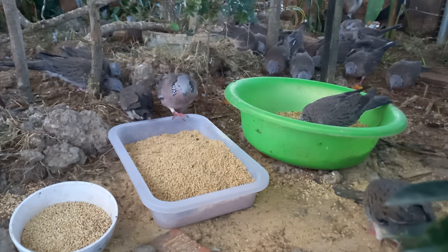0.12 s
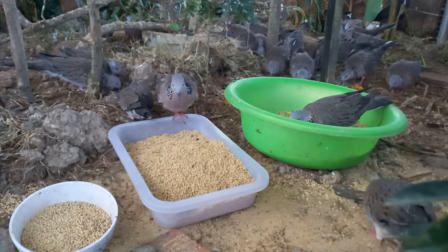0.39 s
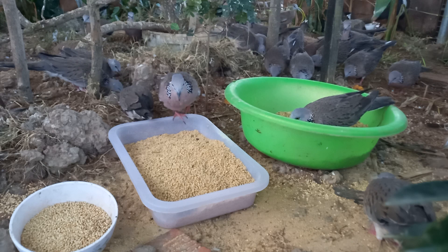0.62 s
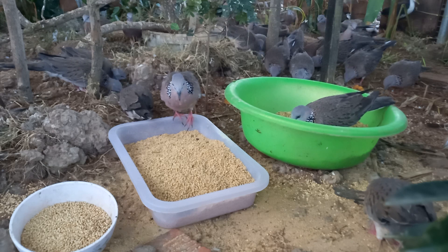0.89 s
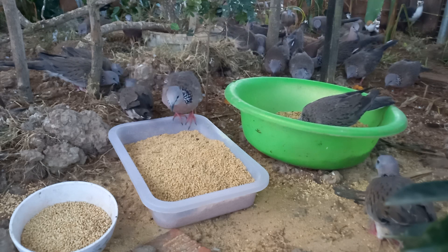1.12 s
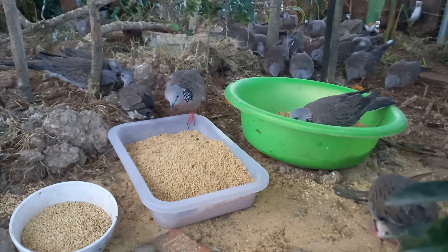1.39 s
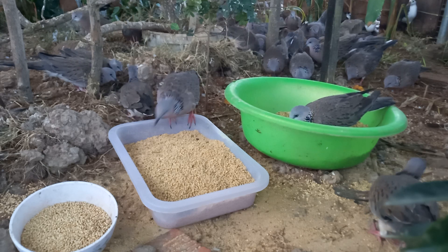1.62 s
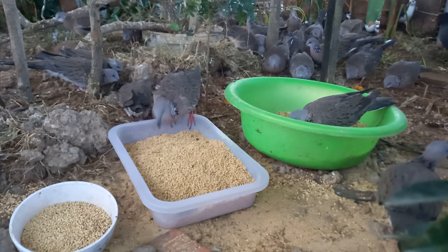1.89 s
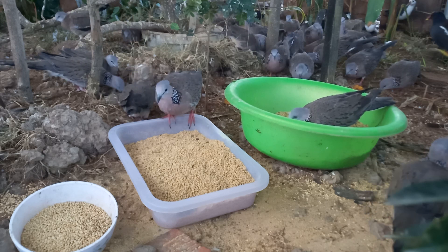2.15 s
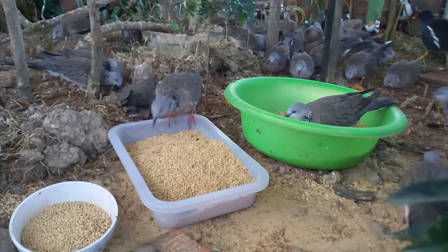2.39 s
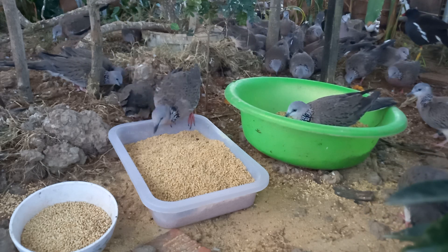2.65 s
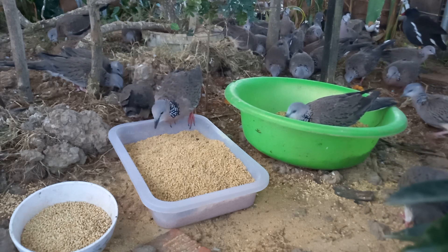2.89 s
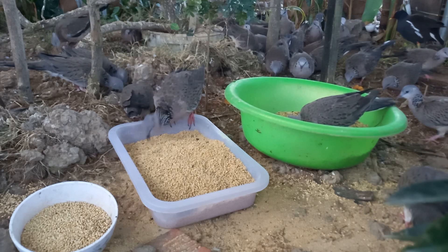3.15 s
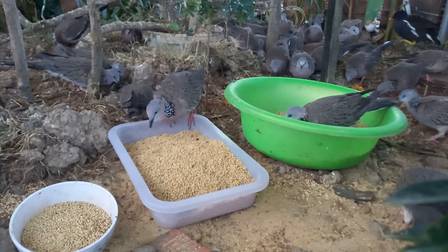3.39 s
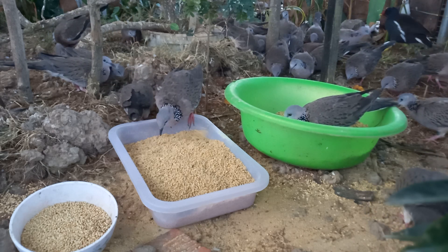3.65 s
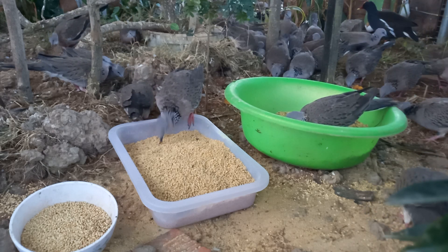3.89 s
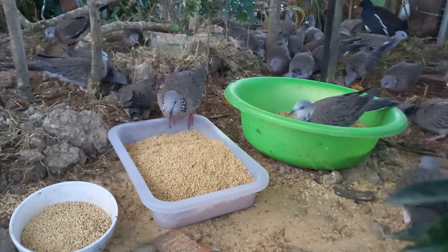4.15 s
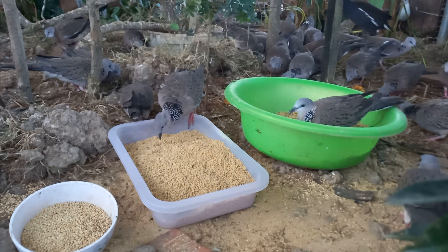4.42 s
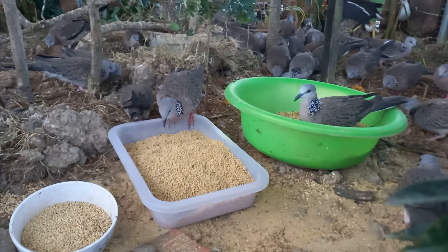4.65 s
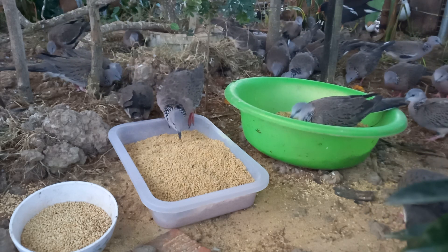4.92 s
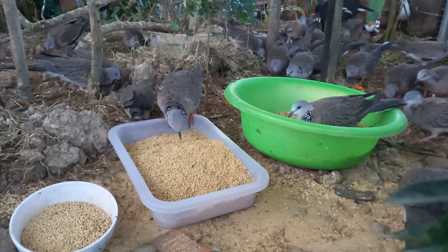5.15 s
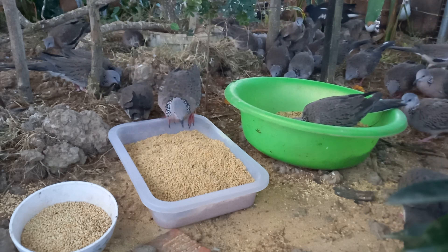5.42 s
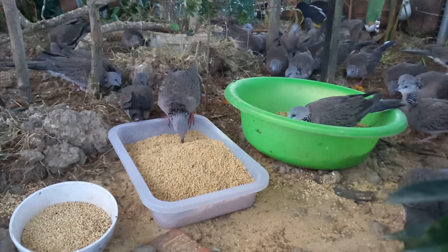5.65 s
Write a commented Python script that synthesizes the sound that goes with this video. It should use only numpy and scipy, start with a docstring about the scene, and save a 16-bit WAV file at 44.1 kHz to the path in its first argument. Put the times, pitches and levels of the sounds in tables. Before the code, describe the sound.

Stereo phone pickup in a leafy enclosure with short reverberation. Doves near the middle coo low and fluttering, first short hoots, later long rolls and one high arched hoot. Close songbirds whistle early, screech and squawk harshly between two and three seconds, then chirp again near the end. Behind are thin far chirps, clucks, dry rustle, seed ticks and a soft hum.

```python
"""Low town rumble and small distant chirps are heard first; near songbirds then whistle and rasp.
Doves coo in a large planted aviary: short hoots and long rolled coos near 650 Hz, and one high hoot.
Doves are near-pure tones shaken by throat flutter; songbirds are tones smeared by random rasp, with breath.
Shaped noise makes the far chorus, rustling, seed ticks, insect buzz and rumble; two sines add a hum.
A phone with two spaced microphones hears it all, with the echo of the enclosure on the bird voices."""
import sys
import numpy as np
from scipy import signal
from scipy.fft import rfft, irfft, next_fast_len
from scipy.io import wavfile
from scipy.ndimage import uniform_filter1d, map_coordinates

SR = 44100
rng = np.random.default_rng(int(sys.argv[2]) if len(sys.argv) > 2 else 0)


def gain_from_decibels(decibels):
    """Convert decibel values to linear amplitude factors."""
    exponent = np.asarray(decibels, float) / 20
    return 10 ** exponent


def generate_wav(signal):
    """Clip the signal to [-1, 1] and save it as 16-bit WAV at the path in sys.argv[1]."""
    frames = np.transpose(np.atleast_2d(signal))
    scaled = np.clip(frames, -1, 1) * 32767
    pcm = np.round(scaled).astype(np.int16)
    wavfile.write(sys.argv[1], SR, pcm)


N = 255339
TIME = np.arange(N) / SR

# Town rumble, spectrum: (frequency [Hz], relative density [dB per Hz])
RUMBLE_SPECTRUM = [(15, -72.5), (25, -31.5), (44, -5.5), (75, 4), (198, -9), (234, -9.5), (309, -14),
                   (350, -17.5), (372, -23.5), (701, -29), (1000, -32.5), (1300, -59), (2200, -120)]
# Rumble strength: (time [s], level [dB])
RUMBLE_LEVEL = [(0, -44), (.6, -50), (1, -44.5), (1.4, -50), (1.9, -44.5), (2.2, -52), (3.5, -51.5),
                (4.6, -48.5), (5, -44), (5.79, -44)]
# A far machine's hum: (frequency [Hz], mean level against the rumble [dB])
MACHINE_HUM = [(118, -5), (232, -15)]
# Far chorus, spectrum: (frequency [Hz], relative density [dB per Hz])
CHORUS_SPECTRUM = [(600, -54), (1000, -23), (1900, -16.5), (2800, -4.5), (5800, -10.5), (6400, -20.5),
                   (9000, -29), (12000, -65)]
# Far chorus strength: (time [s], level [dB])
CHORUS_LEVEL = [(0, -49.5), (.5, -56.5), (.85, -47.5), (1.1, -37), (1.38, -51), (1.44, -43), (1.9, -43),
                (2.15, -52), (2.3, -48), (3.15, -54), (3.3, -56), (3.5, -51), (4, -56), (4.45, -40.5),
                (4.55, -54), (4.75, -40.5), (5.15, -40.5), (5.79, -45.5)]
# Rustle, spectrum: (frequency [Hz], relative density [dB per Hz])
RUSTLE_SPECTRUM = [(2940, -33), (5000, -19), (5670, -23), (6790, -15.5), (10300, -22), (12700, -23),
                   (16000, -25)]
# Rustle strength before its random grain: (time [s], level [dB])
RUSTLE_LEVEL = [(0, -71.5), (.45, -59.5), (1.2, -71), (1.8, -75), (1.87, -56.5), (1.94, -45), (2.0, -72.5),
                (3.38, -70.5), (4.02, -76), (4.035, -48.5), (4.12, -57.5), (4.4, -62.5), (4.47, -55.5),
                (4.52, -72.5), (4.97, -65), (5.15, -55.5), (5.6, -66.5), (5.7, -78.5)]
# Beaks and seed on plastic: (time [s], nominal level [dB], left-right difference [dB])
SEED_TICKS = [(0.41, -44, -1), (0.677, -42.5, 6.5), (1.4055, -53.5, 17.5), (1.459, -44.5, -5.5),
              (2.164, -58, -1), (3.3899, -44, -2), (3.7189, -45, -0.5), (4.032, -54.5, -17.5),
              (4.04, -43, 3.5), (4.1045, -35, 3.5), (4.1233, -55, -3.5), (4.1648, -32, 5),
              (4.1869, -36.5, 4), (4.2233, -44, 9), (4.4611, -39.5, 19.5), (4.9622, -38, -13),
              (5.6052, -41.5, -5.5)]
# Reverberation of the enclosure: (frequency [Hz], time to decay by 60 dB [s])
ECHO_DECAY = [(500, 0.2), (3000, 0.16), (10000, 0.065)]

# Far raspy notes: (start [s], length [s], first pitch [Hz], last pitch [Hz], nominal level [dB])
FAR_NOTES = [ (0, 0.014, 2570, 2410, -36.5), (.027, .133, 1428, 2413, -48), (.155, 0.11, 1620, 1306, -46.5),
             (.394, 0.018, 1920, 1950, -56), (.612, 0.053, 2136, 1683, -50),
             (.812, .048, 4460, 4840, -43.5), (.882, 0.032, 1603, 1880, -46.5),
             (1.119, 0.079, 5080, 4260, -43.5), (1.232, 0.15, 4930, 5700, -46.5),
             (1.215, 0.099, 2420, 2826, -45.5), (1.425, 0.3, 3347, 3575, -49.5),
             (1.44, 0.26, 4780, 4750, -49), (1.599, 0.18, 2780, 2690, -46.5),
             (1.715, 0.2, 4220, 4800, -44.5), (1.704, 0.34, 5010, 6070, -46.5),
             (1.992, 0.078, 3620, 3830, -48.5), (2.08, .05, 2510, 2680, -48),
             (2.205, 0.0393, 2260, 2410, -43.5), (2.26, 0.034, 4780, 5330, -39.5),
             (2.362, .1, 4600, 5330, -40.5), (2.704, 0.044, 3600, 3540, -41.5),
             (3.501, 0.054, 5658, 3850, -44), (3.574, .148, 4260, 5520, -43.5),
             (3.599, 0.1, 2360, 2950, -49), (3.818, .083, 2942, 2784, -55), (4.36, 0.12, 3510, 2860, -55.5),
             (4.586, 0.033, 4660, 4580, -52), (4.684, .06, 4620, 5070, -38),
             (4.695, 0.083, 5810, 7520, -43.5), (4.72, 0.061, 2025, 1876, -50),
             (4.86, 0.066, 1667, 1750, -43.5), (5.0, 0.17, 4685, 4540, -49.5),
             (5.203, .04, 2957, 4260, -35.5), (5.235, 0.041, 4890, 3550, -33.5),
             (5.209, 0.033, 5658, 5400, -44), (5.277, .087, 4405, 4950, -40),
             (5.397, 0.12, 4930, 4190, -40.5), (5.437, 0.066, 3050, 3040, -46), ]
# Far low clucks: (start [s], length [s], pitch [Hz])
FAR_CLUCKS = [(0.729, 0.041, 1410), (1.078, 0.025, 1307), (2.226, 0.041, 1332), (3.131, .047, 1595),
              (3.302, 0.12, 1608), (3.491, 0.069, 1486), (3.693, 0.041, 1523), (3.822, 0.047, 1565),
              (3.943, 0.037, 1468), (4.054, .104, 1401), (4.219, 0.062, 1510), (4.398, 0.111, 1490),
              (4.55, 0.026, 1440)]
# Far hard two-band chips: (start [s], nominal level [dB])
FAR_CHIPS = [(0.063, -49), (0.166, -49), (0.326, -49.5), (0.531, -49.5)]
# Far thin sinking notes: (start [s], length [s], nominal level [dB])
FAR_SEEPS = [(2.553, 0.13, -49), (2.914, 0.31, -47.5), (3.755, 0.18, -50), (4.234, 0.27, -46.5)]
# A distant dove: (start [s], end [s], pitch [Hz], nominal level [dB], waver width [Hz])
DISTANT_DOVE = (.589, .746, 835, -72, 30)
CLUCK_DB = -54  # nominal
CHIP_S, CHIP_BANDS_HZ = 0.0506, [(3180, 3060), (4800, 4400)]  # length; first and last pitch of each band
SEEP_HZ = (5800, 5330)  # first and last pitch
# rasp width over pitch for a tenth-second note; power by which shorter notes widen
RASP_WIDTH, SHORT_IS_ROUGH = 0.19, 0.4
SNAP, SNAP_S = 0.72, 0.00267  # extra amplitude at a far note's hard start, and its decay time

# Overtones of a songbird note: (multiple of the pitch, level against the fundamental [dB])
BIRD_OVERTONES = [(2, -29.5), (3, -38), (4, -37), (5, -32.5)]
# Harsh breath, spectrum: (frequency [Hz], relative density [dB per Hz])
BREATH_SPECTRUM = [(1800, -38), (2600, 2.5), (3500, -14), (6000, -13.5), (8000, -19), (12000, -15.5),
                   (16000, -23.5)]
# Call shapes: (time after start [s], pitch before the play's ratio [Hz], level against the play's [dB])
SCREECH_SHAPE = [(0, 3404, -27), (.013, 4000, -2.5), (.05, 4015, 1), (0.097, 3803, -6.5), (.115, 3640, -14),
                 (.18, 3637, -27.5)]
SQUAWK_SHAPE = [(0, 2398, -15), (.042, 2767, -7), (0.069, 2965, -3.5), (.09, 3568, 0.5), (.142, 3191, -4),
                (0.194, 2827, -19)]
TWEET_SHAPE = [(0, 2050, -11), (0.023, 2840, 1), (.05, 2800, -7.5), (.071, 2420, 3.5), (.107, 2250, -19.5)]
CHIRRUP_SHAPE = [(0, 3340, -7), (0.046, 3318, -8.5), (.062, 3765, -0.5), (.095, 3860, -9.5),
                 (.12, 3810, -33)]  # a call in two steps
# Plays of each call: (start [s], pitch ratio, nominal level [dB], left-right difference [dB])
SCREECH_PLAYS = [(2.256, 0.97, -12, -1.5), (2.765, .955, -13.5, -3)]
SQUAWK_PLAYS = [(2.46, 0.99, -17.5, 0), (2.997, 0.97, -20.5, -0.72)]
TWEET_PLAYS = [(4.093, 1.02, -34, 3.7), (4.251, .98, -33, 1.3)]
CHIRRUP_PLAYS = [(4.685, 0.96, -20.5, -2)]
# Single notes: (start [s], top [s], end [s], first pitch [Hz], top pitch [Hz], last pitch [Hz],
# nominal level at the top [dB])
WHISTLE_NOTES = [(0.783, 0.835, .864, 1800, 2993, 3030, -20.5), (.92, 0.944, 1.14, 2810, 2984, 1742, -19.5),
                 (1.94, 1.976, 2.07, 2260, 1914, 1243, -44.5), (2.155, 2.184, 2.225, 1804, 1925, 2000, -35)]
RASPY_NOTES = [(0.594, 0.621, .65, 2960, 3144, 3290, -23), (2.73, 2.78, 2.77, 3000, 3060, 3300, -22),
               (4.849, 4.892, 4.89, 3330, 3404, 3300, -21.5), (4.902, 4.946, 5.11, 2017, 2844, 1603, -26),
               (5.26, 5.289, 5.385, 3350, 3146, 2190, -21.5), (5.485, 5.535, 5.575, 2200, 3387, 3830, -23)]
RISE_DB, RISE_BEND, FALL_DB, FALL_BEND = 19.5, 1.93, 21.5, 1.3  # depth and curvature of rise and fall
# perch and voice of each kind: (left lag [ms], rasp share [0-1])
SCREECHER, SQUAWKER, TWEETER, CHIRRUPER = (0.089, 0.8), (-0.092, 0.72), (-0.02, 0.34), (0.14, 0.6)
# the same for single notes: (left lag [ms], rasp share [0-1], left-right difference [dB])
WHISTLER, RASPER = (0.33, 0.2, -3), (0.047, 0.852, -1.8)
RASP_ONSET = 0.5  # rasp sets in as this power of the greatest amplitude reached so far

# Dove coos: (start [s], loudest [s], end before the break [s], level at the loudest, unrolled [dB],
# pitch after the attack, before settling [Hz], roll [0-1])
DOVE_COOS = [ (-.3, -0.024, .02, -37.5, 625, 0.99), (1.162, 1.216, 1.232, -27.5, 632, .1),
             (1.39, 1.434, 1.467, -25.5, 645, 0.14), (1.612, 1.931, 1.992, -24, 682, 0.76),
             (2.515, 2.559, 2.65, -33, 619, 0.66), (2.755, 3.027, 3.085, -27, 678, 0.78),
             (3.89, 3.905, 3.96, -30.5, 681, 0.67), (4.632, 4.924, 5.012, -19.5, 691.7, 0.95),
             (5.05, 5.107, 5.13, -31.5, 591, 0.44), (5.251, 5.429, 5.4, -26, 653.7, 0.83),
             (5.381, 5.567, 5.65, -19, 688, 0.66), ]
# One high arched hoot rolled at both ends: (time [s], level [dB], pitch [Hz], roll [0-1])
HIGH_HOOT = [(4.312, -53, 565, 0.4), (4.33, -28.5, 629, 0.84), (4.37, -23.5, 747, 0.5),
             (4.39, -29, 782, 0.14), (4.45, -23, 770, 0), (4.476, -21, 729, 0.73), (4.5, -32, 660, 1),
             (4.52, -60, 656, .8)]
COO_ATTACK_S, ATTACK_DB, ATTACK_HZ = 0.024, -22, 125  # the voice starts soft, and flat by ATTACK_HZ
SWELL_DB_PER_S, FADE_DB_PER_S = 21, 70  # before and after the loudest moment
DRIFT_HZ_PER_S, SAG_HZ_PER_S = 150, 634  # pitch sinks slowly, then fast
CUT_S, CUT_DB, CUT_HZ = 0.0086, -12.5, 28  # the voice breaks off
TAIL_SHARE, TAIL_DB, TAIL_HZ_PER_S = 0.33, -13.5, 1260  # a murmur trails, as a share of the coo's length
ROLL_LEAST_S, CLEARS_EARLY_S, CLEARING_S, ROLL_LEFT = 0.16, 0.065, 0.075, 0.17  # the roll smooths out
SETTLE_HZ, OPEN_DB = 39.2, 4.5  # as the roll clears, the voice drops in pitch and opens up


def unit(x):
    """Normalization: scales a signal to rms 1."""
    return x / np.sqrt(np.mean(np.abs(x) ** 2) + 1e-20)


def along(points, hz):
    """Logarithmic frequency scale: interpolates (frequency [Hz], value) points."""
    f, v = np.transpose(points)
    return np.interp(np.log(hz + 1), np.log(f + 1), v)


def wobble(rate, size=N):
    """Slow random modulation: a smooth curve through `rate` random knots a second."""
    knots = rng.standard_normal(size // 10 + 8)
    return map_coordinates(knots, [np.arange(size) * rate / SR])


def rasp(width_hz, size):
    """Random modulation: complex shaking that smears a tone over a band."""
    return (wobble(width_hz, size) + 1j * wobble(width_hz, size)) / np.sqrt(2)


def filtered(x, response):
    """Linear filtering: multiplies the spectrum by a response of frequency."""
    m = next_fast_len(N + 8192)
    return irfft(rfft(x, m) * response(np.fft.rfftfreq(m, 1 / SR)), m)[..., :N]


def noise(spectrum, alike):
    """Partial coherence: shaped stereo noise of rms 1, of which a share is common to both microphones."""
    common, left, right = rng.standard_normal((3, N))
    pair = np.sqrt(alike) * common + np.sqrt(1 - alike) * np.array([left, right])
    return unit(filtered(pair, lambda hz: gain_from_decibels(along(spectrum, hz))))


def level_curve(points):
    """Envelope: interpolates (time [s], level [dB]) points over the scene."""
    return np.interp(TIME, *np.transpose(points))


def sung(rows):
    """Sampling of a contour: a call's sample numbers, short edges for its gain, and its columns."""
    s, *cols = np.transpose(rows)
    k = np.arange(round(s[0] * SR), min(N, round(s[-1] * SR)))
    edge = np.clip(np.minimum(k / SR - s[0], s[-1] - k / SR) / 0.002, 0, 1)
    return k, edge, [np.interp(k / SR, s, c) for c in cols]


def town():
    """Interaural delay: rumble and wavering hum reach the right microphone a quarter millisecond early."""
    hum = np.zeros(N)
    for hz, db in MACHINE_HUM:
        phase = 2 * np.pi * hz * TIME + 1.3 * wobble(13)
        hum += np.sqrt(2) * gain_from_decibels(db + 2 * wobble(3.5)) * np.sin(phase)
    left, right = gain_from_decibels(level_curve(RUMBLE_LEVEL)) * (noise(RUMBLE_SPECTRUM, alike=0.91) + hum)
    return np.array([np.roll(left, 11) * gain_from_decibels(-0.8), right * gain_from_decibels(0.8)])


def far_chorus():
    """Diffuse field: countless distant chirps blur into a hiss with patches of a note's size."""
    z = signal.stft(noise(CHORUS_SPECTRUM, alike=0.17), nperseg=512)[2]
    patches = uniform_filter1d(rng.standard_normal(z.shape[1:]), size=6, axis=0)  # over frequency
    patches = uniform_filter1d(patches, size=9, axis=1)  # over time
    hiss = signal.istft(z * gain_from_decibels(4.5 * unit(patches)), nperseg=512)[1][:, :N]
    return gain_from_decibels(level_curve(CHORUS_LEVEL)) * unit(hiss)


def insect():
    """Amplitude modulation: a faint thin buzz near 8.5 kHz pulses about seven times a second."""
    buzz = noise([(8200, -44), (8500, 9), (8700, -17.5), (9000, -52.5)], alike=0.07)
    return gain_from_decibels(-74.5 + 1.7 * np.sin(2 * np.pi * 7.3 * TIME) + 2.9 * wobble(14)) * buzz


def rustle():
    """Impulsive excitation: feet and feathers in dry litter give grainy treble, beaks and seed give ticks."""
    grain_db = 2.2 * wobble(300) + 2.1 * wobble(40)
    bed = gain_from_decibels(level_curve(RUSTLE_LEVEL) + grain_db) * noise(RUSTLE_SPECTRUM, alike=0.1)
    t = np.arange(SR // 50) / SR
    shape = gain_from_decibels(-60 * t / 0.011) * (1 - np.exp(-t / 0.00051))  # fast onset, decay by 60 dB in 11 ms
    for s, db, pan_db in SEED_TICKS:
        crack = np.diff(rng.standard_normal((2, len(t) + 1))) * shape
        bed[:, round(s * SR):][:, :len(t)] += crack * gain_from_decibels(db + np.array([[0.5], [-0.5]]) * pan_db)
    return bed


def far_notes():
    """Bandwidth and duration: far notes as (start [s], end [s], two pitches [Hz], level [dB], rasp [Hz])."""
    notes = FAR_NOTES + [(s, length, hz, hz, CLUCK_DB) for s, length, hz in FAR_CLUCKS]
    notes += [(s, CHIP_S, *band, db) for s, db in FAR_CHIPS for band in CHIP_BANDS_HZ]
    notes += [(s, length, *SEEP_HZ, db) for s, length, db in FAR_SEEPS]
    out = []
    for s, length, first_hz, last_hz, db in notes:
        width_hz = RASP_WIDTH * (first_hz + last_hz) / 2 * (10 * length) ** -SHORT_IS_ROUGH
        out.append((s, s + length, first_hz, last_hz, db, width_hz))
    start, end, hz, db, waver_hz = DISTANT_DOVE
    return out + [(start, end, hz, hz, db, waver_hz)]


def chatter():
    """Loss of coherence with distance: notes start fast, waver and die away, unlike at each microphone."""
    out = np.zeros((2, N))
    for start, end, first_hz, last_hz, db, width_hz in far_notes():
        k, edge, (hz, done) = sung([(start, first_hz, 0), (end, last_hz, 1)])
        since = done * (end - start)
        swell = edge * (1 - np.exp(-since / 0.002)) * (1 - done ** 2) * gain_from_decibels(2.5 * wobble(35, len(k)))
        swell *= 1 + SNAP * np.exp(-since / SNAP_S)
        tone = np.exp(2j * np.pi * np.cumsum(hz) / SR)
        common = 0.42 + 1.14 * rasp(width_hz, len(k))
        for side, sign in enumerate((1, -1)):
            delayed = common * np.exp(-1j * np.pi * hz * sign * 0.0002796)  # left lags by 0.28 ms
            shaken = (delayed + 0.85 * rasp(width_hz, len(k))) * tone
            out[side, k] += np.sqrt(2) * swell * gain_from_decibels(db) * shaken.imag
    return out


def arch(start, top, end, first_hz, top_hz, last_hz, db):
    """Pitch and level contour: rows (time [s], pitch [Hz], level [dB]) up to a top, then away ever faster."""
    u = np.linspace(0, 1, num=12)
    rise = [start + u * (top - start), first_hz + u * (top_hz - first_hz), db - RISE_DB * (1 - u) ** RISE_BEND]
    fall = [top + u * (end - top), top_hz + u ** FALL_BEND * (last_hz - top_hz), db - FALL_DB * u ** FALL_BEND]
    return np.hstack([rise, np.array(fall)[:, 1:]]).T


def song():
    """Transposition: near notes as (left-right difference [dB], left lag [ms], rasp share, rows)."""
    calls = [(SCREECHER, SCREECH_SHAPE, SCREECH_PLAYS), (SQUAWKER, SQUAWK_SHAPE, SQUAWK_PLAYS),
             (TWEETER, TWEET_SHAPE, TWEET_PLAYS), (CHIRRUPER, CHIRRUP_SHAPE, CHIRRUP_PLAYS)]
    notes = []
    for bird, shape, plays in calls:
        for s, ratio, db, pan_db in plays:
            notes.append((pan_db, *bird, np.array(shape) * [1, ratio, 1] + [s, 0, db]))
    for (lag_ms, share, pan_db), table in [(WHISTLER, WHISTLE_NOTES), (RASPER, RASPY_NOTES)]:
        notes += [(pan_db, lag_ms, share, arch(*note)) for note in table]
    return notes


def songbirds():
    """Modulated harmonic source: a whistle with weak overtones, shaken by rasp, plus harsh breath."""
    out, effort = np.zeros((2, N)), np.zeros(N)
    for pan_db, lag_ms, share, rows in song():
        k, edge, (hz, db) = sung(rows)
        share = share * gain_from_decibels(RASP_ONSET * (np.maximum.accumulate(db) - db.max()))  # a note starts cleaner
        rough = rasp(380.7, len(k)) + 0.27 * rasp(1400, len(k))
        shake = np.sqrt(1 - share) + np.sqrt(share) * rough
        slip = 0.08 * np.tanh(wobble(220, len(k)) ** 2 / 2)
        hz = hz * (1 - share * slip)  # the voice keeps slipping below its pitch
        tone = shake / np.abs(shake) * np.exp(2j * np.pi * np.cumsum(hz) / SR)
        loudness = 1.5 * np.tanh(np.abs(shake) / 1.3)  # the voice has a ceiling
        effort[k] += edge * gain_from_decibels(db) * np.sqrt(share)
        for side, sign in enumerate((1, -1)):  # each bird reaches one microphone first
            z = tone * np.exp(-1j * np.pi * hz * sign * lag_ms / 1000)
            stack = z + sum(gain_from_decibels(level) * (m * hz < 16000) * z ** m for m, level in BIRD_OVERTONES)
            out[side, k] += np.sqrt(2) * edge * gain_from_decibels(db + sign * pan_db / 2) * loudness * stack.imag
    breath = gain_from_decibels(-21.5) * effort * noise(BREATH_SPECTRUM, alike=0.073)
    return out + breath


def coo_shape(start, peak, end, db, hz, roll):
    """Phases of a voiced sound: rows (time [s], level [dB], pitch [Hz], roll) from attack to murmur."""
    on, cut, tail_s = start + COO_ATTACK_S, end + CUT_S, TAIL_SHARE * (end - start)
    peak = max(peak, on + 1 / SR)
    on_db, end_db = db - SWELL_DB_PER_S * (peak - on), db - FADE_DB_PER_S * (end - peak)
    peak_hz = hz - DRIFT_HZ_PER_S * (peak - on)
    end_hz = peak_hz - SAG_HZ_PER_S * (end - peak)
    cut_db, cut_hz = end_db + CUT_DB, end_hz - CUT_HZ
    s = np.arange(max(start, 0), cut + tail_s, 1 / 500)
    knots = [start, on, peak, end, cut, cut + tail_s]
    level = [on_db + ATTACK_DB, on_db, db, end_db, cut_db, cut_db + TAIL_DB]
    pitch = [hz - ATTACK_HZ, hz, peak_hz, end_hz, cut_hz, cut_hz - TAIL_HZ_PER_S * tail_s]
    clears = max(peak - CLEARS_EARLY_S, start + ROLL_LEAST_S)
    rolled = np.interp(s, [clears, clears + CLEARING_S], [roll, roll * ROLL_LEFT])
    level = np.interp(s, knots, level) - OPEN_DB * rolled
    pitch = np.interp(s, knots, pitch) - SETTLE_HZ * (roll - rolled)
    return np.transpose([s, level, pitch, rolled])


def doves():
    """Frequency and amplitude modulation: throat flutter, some 57 times a second, rolls a near-pure tone."""
    flutter = 2 * np.pi * np.cumsum(57 * (1 + 0.2215 * wobble(35))) / SR
    swing_hz = 72 * np.tanh(2.4 * np.sin(flutter)) + 20 * wobble(110)  # the pitch flips
    throb = 0.52 * np.cos(flutter) + 0.25 * wobble(90)  # the level swings
    out = np.zeros(N)
    for rows in [coo_shape(*coo) for coo in DOVE_COOS] + [HIGH_HOOT]:
        k, edge, (db, hz, roll) = sung(rows)
        phase = 2 * np.pi * np.cumsum(hz + roll * swing_hz[k]) / SR
        out[k] += np.sqrt(2) * edge * gain_from_decibels(db) * (1 + roll * throb[k]) * np.sin(phase)
    return filtered(out, lambda hz: 1 / (1 + (hz / 815) ** 30))  # the swollen crop stops what lies above


def enclosure(pair):
    """Reverberation: each frequency decays at its own speed; long waves sound alike at both microphones."""
    hz, t, z = signal.stft(rng.standard_normal((3, SR // 2)), SR, nperseg=256)
    apart = np.clip((hz[:, None] - 300) / 1500, 0, 1)
    z = np.sqrt(1 - apart) * z[2] + np.sqrt(apart) * z[:2]
    tail = signal.istft(z * gain_from_decibels(-60 * t / along(ECHO_DECAY, hz)[:, None]), SR, nperseg=256)[1]
    tail = tail / np.linalg.norm(tail[0])
    late = np.pad(pair, ((0, 0), (300, 0)))  # samples of delay before the echo
    return signal.fftconvolve(late, tail, axes=1)[:, :N]


def scene():
    """Superposition: all sources add, with the doves near the middle and a little ahead on the left."""
    background = town() + far_chorus() + insect() + rustle()
    far, birds, coo = chatter(), songbirds(), doves()
    coo = np.array([coo * gain_from_decibels(-0.5), np.roll(coo, 4) * gain_from_decibels(0.5)])
    echo = enclosure(gain_from_decibels(-11) * coo + gain_from_decibels(-5.5) * birds + gain_from_decibels(1.5) * far)
    return background + far + birds + coo + echo


def band_limit(x):
    """A steep low-pass at the top of the band."""
    return signal.sosfilt(signal.butter(12, 16480, fs=SR, output="sos"), x)


def record(dry):
    """Two-point pickup: the pair of microphone signals is the finished mix."""
    return band_limit(dry)


dry = scene()
out = record(dry)
generate_wav(out)
```